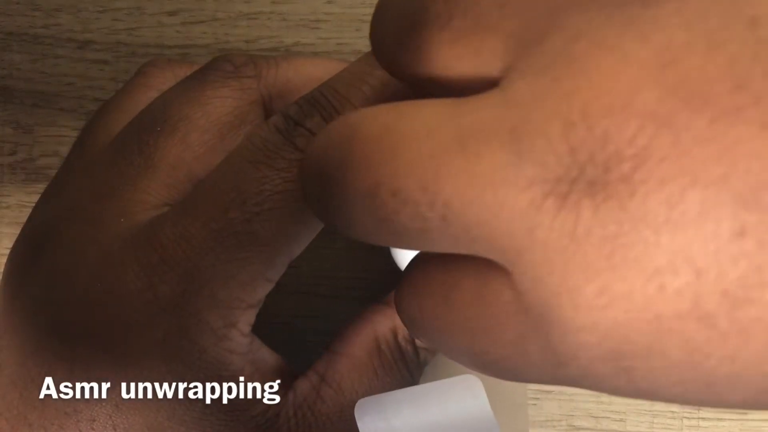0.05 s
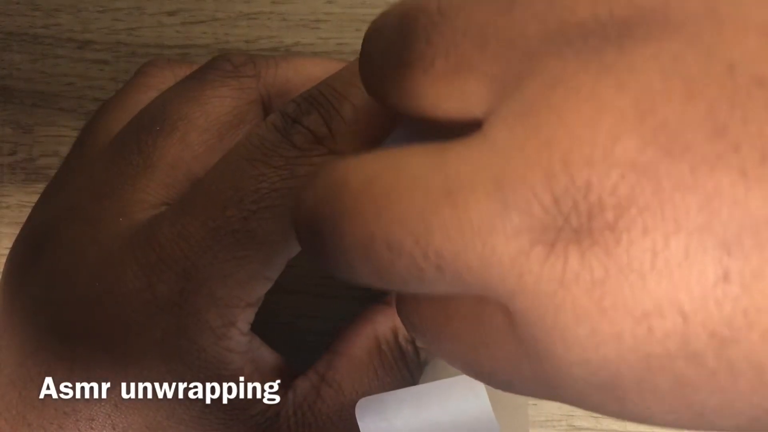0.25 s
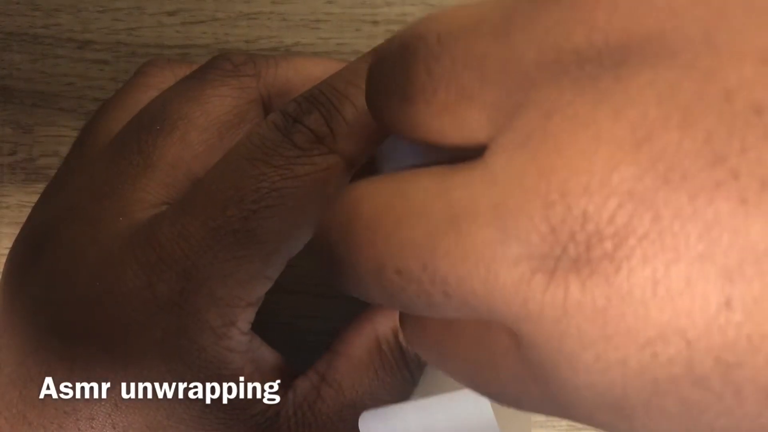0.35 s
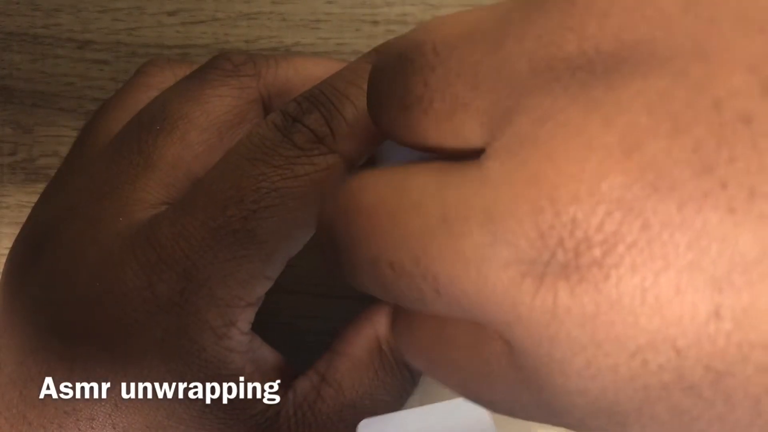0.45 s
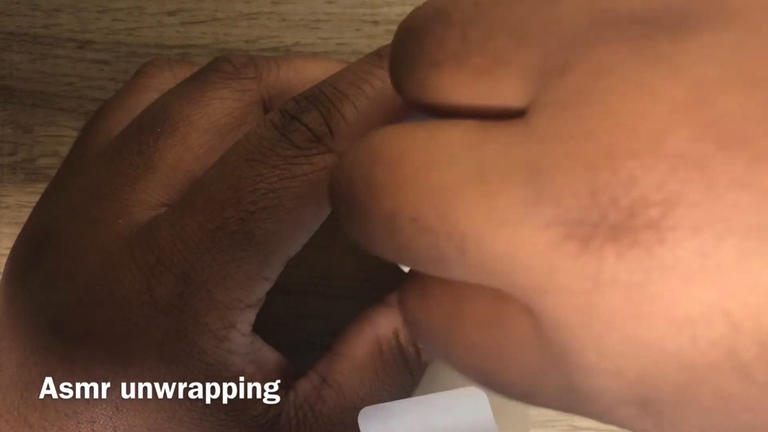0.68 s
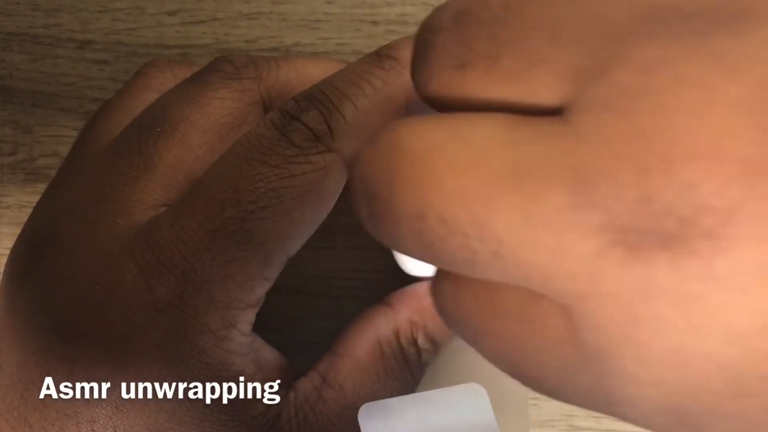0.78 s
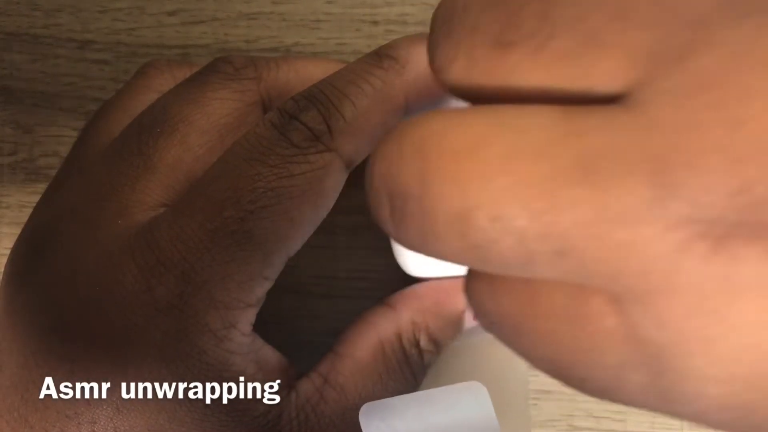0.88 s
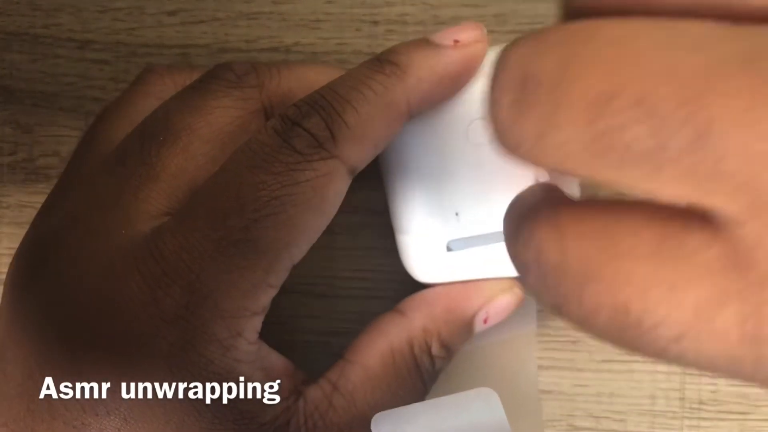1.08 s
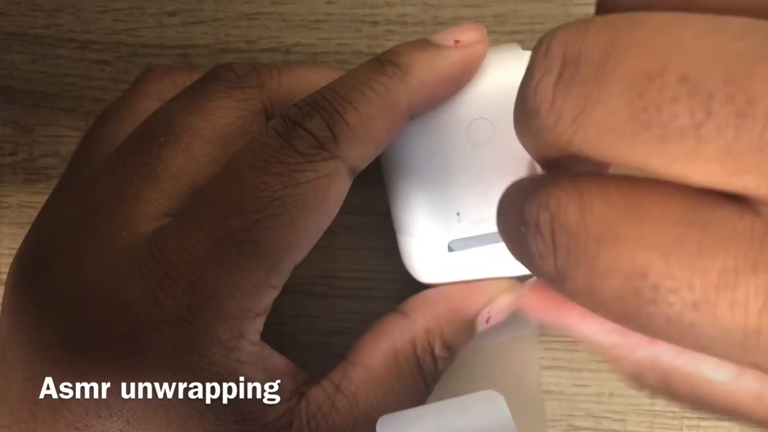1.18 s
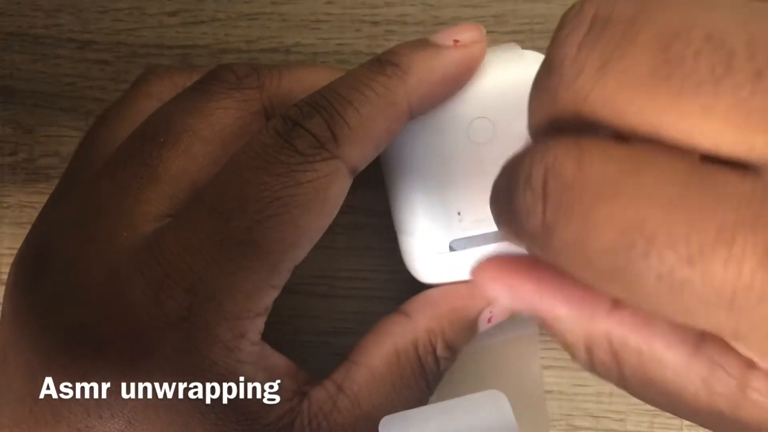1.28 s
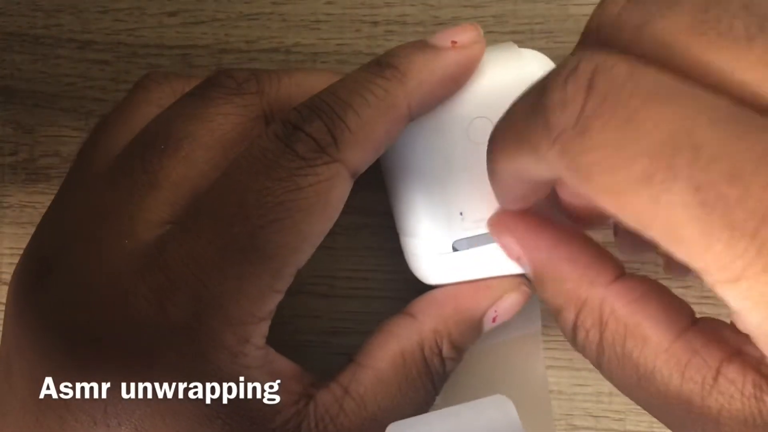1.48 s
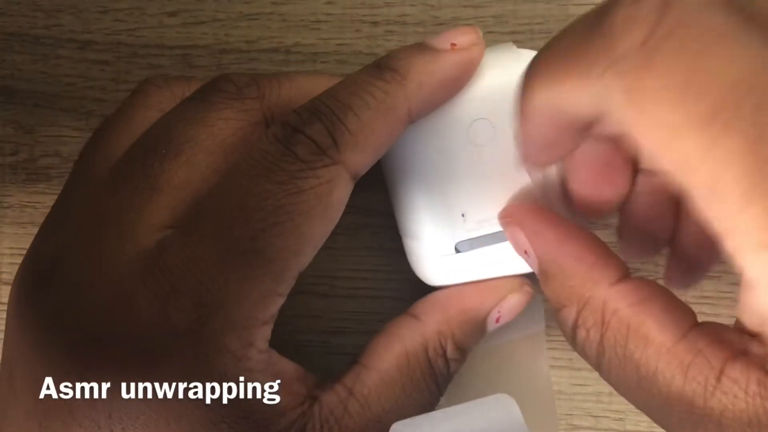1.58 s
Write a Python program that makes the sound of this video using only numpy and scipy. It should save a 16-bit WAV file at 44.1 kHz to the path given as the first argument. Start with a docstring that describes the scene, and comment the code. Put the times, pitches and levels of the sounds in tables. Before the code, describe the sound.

The lid of a small plastic case closes with a loud, close snap, followed by a lighter knock. Faint finger rubbing and soft bumps on wood lead to a thin double click, in a quiet room with a faint hum.

```python
"""A light brush of skin, then the lid of a small hollow plastic case catches and snaps shut, close by.
The case knocks once more; later a fingertip slips off an edge with a thin double click.
Each contact rings the thin shell and the hollow body. In between, fingers rub and shift the case
with stick-slip friction, and the hand bumps and drags on a wooden table.
A faint hum and rumble lie underneath, in a quiet room with a short echo."""
import sys
import numpy as np
from scipy import signal
from scipy.fft import rfft, irfft
from scipy.io import wavfile

SR = 44100
rng = np.random.default_rng(int(sys.argv[2]) if len(sys.argv) > 2 else 0)


def wav_out(sig):
    """Save sig, one row per channel (or a flat mono array), as 16-bit PCM at SR to the path in sys.argv[1]."""
    wavfile.write(sys.argv[1], SR, np.round(np.clip(np.atleast_2d(sig).T, -1, 1) * 32767).astype(np.int16))


N = 72765


def from_db(db):
    """Decibels to gain."""
    return 10 ** (np.asarray(db) / 20)


def unit_rms(x):
    """Scale to unit rms."""
    return x / np.sqrt(np.mean(x ** 2) + 1e-20)


def seconds():
    """Time of every sample."""
    return np.arange(N) / SR


def at_hz(points, hz, column=1):
    """Interpolate a table column over log frequency."""
    table = np.array(points)
    return np.interp(np.log(hz + 1e-9), np.log(table[:, 0]), table[:, column])


def coloured(x, spectrum, tilt_db_per_octave=0):
    """Apply a spectrum and a tilt; unit rms out."""
    hz = np.arange(N // 2 + 1) * SR / N
    octaves = np.log2(np.maximum(hz, 20) / 6000)
    gain = from_db(at_hz(spectrum, hz) + tilt_db_per_octave * octaves)
    return unit_rms(irfft(rfft(x) * gain, N))


def impulses(times_s, levels_db):
    """One impulse per contact."""
    hits = np.zeros(N)
    hits[np.round(times_s * SR).astype(int)] = from_db(levels_db)
    return hits


def stroke(peak_s, level_db, rise_s, hold_s, fall_s):
    """Envelope of one movement, held from peak_s; rise and fall each span 20 dB."""
    t = seconds() - peak_s
    rising = np.maximum(-t, 0) / rise_s
    falling = np.maximum(t - hold_s, 0) / fall_s
    return from_db(level_db - 20 * (rising + falling))


def ring(x, hz, t60_s):
    """Damped mode; a unit impulse rings at amplitude 1."""
    radius, angle = from_db(-60 / (t60_s * SR)), 2 * np.pi * hz / SR
    return signal.lfilter([1, 0, -1], [1, -2 * radius * np.cos(angle), radius ** 2], x + 1e-18) / 2


def resonance(x, hz, width_hz):
    """Band-pass with peak gain independent of width."""
    t60_s = np.log(1000) / (np.pi * width_hz)
    return 2 * np.pi * width_hz / SR * ring(x, hz, t60_s)


def friction(grains_per_s=3000, spread_db=6, hiss_share=0.7):
    """Stick-slip grains of uneven size over smooth hiss."""
    sizes = from_db(spread_db * np.minimum(rng.exponential(1, N), 4)) * rng.choice([-1, 1], N)
    grains = unit_rms(sizes * (rng.random(N) < grains_per_s / SR))
    return np.sqrt(1 - hiss_share) * grains + np.sqrt(hiss_share) * rng.standard_normal(N)


# Motor partials: pitch_hz, rms_db
MOTOR_HUM = [(58.5, -51), (87, -55), (117.6, -53.5), (203.8, -62.5), (232.5, -62), (290, -61.5)]
# Rumble and hiss: freq_hz, relative_db
FLOOR_SPECTRUM = [(20, -9), (35, -7), (55, 2.5), (100, -4.5), (190, 2), (300, -7.5), (450, -8),
                  (700, -16.5), (1500, -23.5), (3000, -29.5), (6000, -31), (15000, -33)]


def background(floor_db=-49.5):
    """Hum of a distant motor over room rumble and hiss."""
    hum = sum(np.sqrt(2) * from_db(db) * np.sin(2 * np.pi * (hz * seconds() + rng.random()))
              for hz, db in MOTOR_HUM)
    return hum + from_db(floor_db) * coloured(rng.standard_normal(N), FLOOR_SPECTRUM)


# Diffuse field: freq_hz, echo_gain_db, t60_s
ROOM_ECHO = [(200, -6.5, .38), (600, -12.5, 0.3), (1500, -13, 0.6), (3200, -10.5, .42), (7500, -12, 0.31),
             (14440, -11.5, 0.15)]


def room_bands(onset_s=0.0021):
    """Yield centre_hz, noise and decay envelope for each band of the diffuse field."""
    t, hz = seconds(), np.arange(N // 2 + 1) * SR / N
    white = rfft(rng.standard_normal(N))
    edges_hz = np.geomspace(100, 18000, 27)
    for low, high in zip(edges_hz, edges_hz[1:]):
        centre_hz = np.sqrt(low * high)
        noise = irfft(white * ((hz >= low) & (hz < high)), N)
        t60_s = at_hz(ROOM_ECHO, centre_hz, column=2)
        decay = from_db(-60 * t / t60_s) * (1 - np.exp(-t / onset_s))
        gain = from_db(at_hz(ROOM_ECHO, centre_hz)) / np.sqrt(np.sum(decay ** 2))
        yield centre_hz, noise, gain * decay


# Body radiation into the room: freq_hz, gain_db
BODY_SEND = [(100, -4.5), (400, 17), (1000, 24), (1500, 27), (2200, 18), (2800, 22.5), (3300, 14.5),
             (4300, 20), (6000, 14.5), (9000, 5.5), (16000, 7)]
# Shell radiation into the room: freq_hz, gain_db
SHELL_SEND = [(100, -19), (1000, -13), (3000, -3), (4500, -2), (6500, 4.5), (10000, 3.5), (16000, 0)]


def room(contacts, handling, handling_send=0.6):
    """Each contact adds energy to a smooth dying echo; handling noise echoes in the same room."""
    times_s, shell_db, body_db = np.transpose(contacts)[:3]
    tail, response = 0, 0
    for centre_hz, noise, decay in room_bands():
        body = impulses(times_s, body_db + at_hz(BODY_SEND, centre_hz))
        shell = impulses(times_s, shell_db + at_hz(SHELL_SEND, centre_hz))
        energy = signal.fftconvolve(body ** 2 + shell ** 2, decay ** 2)[:N]
        tail += noise * np.sqrt(np.abs(energy))
        response += noise * decay
    return tail + handling_send * signal.fftconvolve(handling, response)[:N]


# Hand drags: peak_s, level_db, rise_s, hold_s, fall_s
DRAG_STROKES = [(0.847, -50.5, .140, 0.056, 0.043), (1.198, -58.5, 0.096, 0.041, .080)]
# Skin on wood: freq_hz, relative_db
DRAG_SPECTRUM = [(100, 1.5), (400, 4), (800, -5.5), (1300, -1.5), (1650, -13), (2050, -4), (2600, -22),
                 (8000, -28)]


def hand_drags():
    """The hand sticks and slips across the table."""
    return sum(stroke(*drag) for drag in DRAG_STROKES) * coloured(friction(), DRAG_SPECTRUM)


# Table bumps: peak_s, level_db, rise_s, hold_s, fall_s
BUMP_STROKES = [(0.202, -32, 0.0022, 0.0054, .020), (0.529, -37.5, 0.00088, 0.009, 0.013),
                (0.904, -46.5, .004, 0.0046, 0.022)]
# Wooden top: freq_hz, relative_db
WOOD_SPECTRUM = [(60, -8.5), (170, 0.5), (300, -4), (440, 2.5), (620, -16.5), (1300, -25.5), (2500, -40),
                 (8000, -57.5)]


def table_bumps():
    """Soft bumps draw dull thuds from the wood."""
    return sum(stroke(*bump) for bump in BUMP_STROKES) * coloured(rng.standard_normal(N), WOOD_SPECTRUM)


# Brush fade: time_s, level_db
BRUSH_ENVELOPE = [(0.0, -36), (0.025, -43), (0.074, -52), (0.12, -61), (0.191, -81.5)]
# Airy skin noise: freq_hz, relative_db
BRUSH_SPECTRUM = [(500, -9), (2200, -14.5), (4300, -9), (5200, 0.5), (6200, -9), (7400, -13), (8600, -9.5),
                  (10500, -8.5), (11900, -2), (13500, -5.5), (16000, -4)]


def skin_brush():
    """Skin brushes lightly past as the grip changes."""
    times_s, level_db = np.transpose(BRUSH_ENVELOPE)
    envelope = from_db(np.interp(seconds(), times_s, level_db))
    return envelope * coloured(rng.standard_normal(N), BRUSH_SPECTRUM)


# Case shifts: peak_s, level_db, rise_s, hold_s, fall_s
SLIDE_STROKES = [(0.232, -44, 0.016, 0.0098, 0.032), (0.301, -39, .05, 0.034, 0.029)]
# Sliding case resonances: pitch_hz, width_hz, relative_db
SLIDE_MODES = [(1480, 580, -5), (2630, 470, -7), (3800, 350, 2.5), (4380, 450, 2.5), (7300, 380, -3),
               (9300, 500, -6.5), (11400, 540, -10.5), (12900, 520, -10.5)]


def case_slides():
    """Friction drives the resonances of the case as it shifts under the fingers."""
    grain = friction()
    ringing = sum((-1) ** k * from_db(db) * resonance(grain, hz, width_hz)
                  for k, (hz, width_hz, db) in enumerate(SLIDE_MODES))
    return sum(stroke(*slide) for slide in SLIDE_STROKES) * unit_rms(ringing)


# Finger rubs: peak_s, level_db, rise_s, hold_s, fall_s, tilt_db_per_octave, hollow_hz
RUB_STROKES = [(0.197, -41, 0.064, 0.0078, .010, -2.5, 7300), (0.48, -51, .060, 0.015, 0.058, -3, 7300),
               (0.515, -48.5, 0.013, 0.013, 0.045, -2, 9200),
               (0.551, -44.5, 0.019, 0.016, 0.017, 0.5, 7300),
               (0.575, -51, 0.017, 0.012, 0.037, -1.5, 2600), (0.635, -61, 0.035, 0.013, .040, -2, 7350),
               (0.719, -48, 0.034, 0.0029, .006, -1, 8860), (0.846, -54, .050, .012, 0.098, 0, 6560),
               (0.88, -48, 0.021, 0.019, 0.013, -0.5, 8240), (0.941, -42, 0.017, 0.0029, 0.0037, 1.5, 8400),
               (1.037, -60, 0.027, 0.023, .060, -3, 5600), (1.146, -55.5, 0.12, 0.09, 0.036, -2.5, 5460),
               (1.297, -42.5, 0.022, 0.033, 0.047, 1, 11160),
               (1.378, -54.5, .010, 0.015, 0.0081, -3, 12000),
               (1.395, -32, 0.015, 0.0014, 0.0058, 1.5, 11500), (1.406, -62, 0.0081, 0.013, 0.096, 0, 6200),
               (1.471, -50, .020, .010, .015, 6, 8360), (1.601, -50.5, .004, 0.01, 0.023, -0.5, 6580),
               (1.645, -60, .030, .010, .030, -1, 8400)]
# Skin on plastic: freq_hz, relative_db
RUB_SPECTRUM = [(300, -8.5), (1000, -5.5), (1700, -8.5), (2300, -3), (3100, -0.5), (3900, -1), (4800, -3),
                (6400, -0.5), (7700, -3), (8700, 1), (10000, -5), (12000, -4), (14000, -6), (16000, -5.5)]


def finger_rubs(modes, ring_db=-11, ring_width_hz=170, hollow_db=-11, hollow_width_hz=260):
    """Skin friction stirs the case modes; the hollow under the hand colours each stroke."""
    grain, rubs = friction(), 0
    ringing = unit_rms(sum(resonance(grain, hz, ring_width_hz) for hz, _, _ in modes))
    rubbed = grain + from_db(ring_db) * ringing
    for *movement, tilt, hollow_hz in RUB_STROKES:
        hollow = from_db(hollow_db) * unit_rms(resonance(grain, hollow_hz, hollow_width_hz))
        rubs += stroke(*movement) * unit_rms(coloured(rubbed, RUB_SPECTRUM, tilt) + hollow)
    return rubs


def struck(modes, times_s, levels_db, scatter_db=1):
    """Each contact rings all modes, with slight random scatter in strength."""
    offsets_db = scatter_db * rng.standard_normal((len(times_s), len(modes)))
    return sum((-1) ** k * ring(impulses(times_s, levels_db + db + offsets_db[:, k]), hz, t60_s)
               for k, (hz, db, t60_s) in enumerate(modes))


# Case contacts: start_s, shell_db, body_db, crack_db, tick_db, tick_hz
CONTACTS = [(0.1974, -11, -32, -34, -13, 7300), (0.2, -12, -48, -32, -22, 7200),
            (0.202, -12, -38, -24, -16, 7400), (0.2038, -6, -47, -21, -10, 9100),
            (0.2065, -2.5, 1.5, -4.5, 3, 7100), (0.2072, -27, -24, -25, 0.5, 4000),
            (0.3357, -6.5, -23, -30, -14.5, 6100), (0.3355, -14.5, -23, -20, -25, 6060),
            (0.5178, -38, -48, -43, -25.5, 4150), (0.7204, -48, -53, -52, -34, 8900),
            (0.937, -38, -56.5, -51, -31, 8400), (0.9447, -38, -51, -55, -37, 8370),
            (1.1945, -40, -44, -52, -36, 6030), (1.3944, -29, -35, -45, -20, 14500),
            (1.397, -27, -53, -33, -32, 9000), (1.398, -9, -45, -40, -0.5, 8500),
            (1.3993, 0, -20, -17, -4, 9200), (1.5390, -39, -59, -52, -43, 13000),
            (1.561, -50, -50.5, -48, -55, 12000), (1.6007, -44, -53, -50, -42.5, 6700)]
# Thin shell and edges: pitch_hz, gain_db, t60_s
SHELL_MODES = [(6060, -15, .011), (6600, -11.5, .008), (7260, -26.5, .010), (8240, -17.5, 0.01),
               (9100, -20, .007), (10500, -24, 0.018), (11550, -20.5, 0.0099), (12200, -15.5, 0.0051),
               (15200, -26.5, .007)]
# Hollow body: pitch_hz, gain_db, t60_s
BODY_MODES = [(860, -11, 0.014), (1095, -7.5, .013), (1389, -11.5, .018), (2093, -4.5, 0.018),
              (2766, -6.5, 0.012), (3757, -11, 0.023), (4070, -4.5, 0.0032), (4486, -8, 0.015),
              (5100, -22.5, 0.0092), (6600, -19.5, 0.003), (7320, -15, 0.021)]
# Gritty crack: freq_hz, relative_db
CRACK_SPECTRUM = [(200, -10.5), (600, -7.5), (1500, -6.5), (4000, -4), (7000, -6.5), (10000, 1), (13000, 1),
                  (16000, -10)]


def case_clicks(tick_t60_s=0.0017, crack_t60_s=0.011, low_cut_hz=660):
    """Hard plastic contacts: edge tick, brief crack, bright shell ring and hollow body ring."""
    times_s, shell_db, body_db, crack_db, tick_db, tick_hz = np.transpose(CONTACTS)
    ticks = sum(ring(impulses(start_s, db), hz, tick_t60_s)
                for start_s, db, hz in zip(times_s, tick_db, tick_hz))
    decay_per_sample = from_db(-60 / (crack_t60_s * SR))
    crack_envelope = signal.lfilter([1], [1, -decay_per_sample], impulses(times_s, crack_db) + 1e-18)
    crack = crack_envelope * coloured(rng.standard_normal(N), CRACK_SPECTRUM)
    shell = struck(SHELL_MODES, times_s, shell_db)
    body = struck(BODY_MODES, times_s, body_db)
    # A small case radiates little bass.
    radiation = signal.butter(4, low_cut_hz, "high", fs=SR, output="sos")
    return signal.sosfilt(radiation, ticks + shell + body + crack)


def scene():
    """The handled case in its room, mono."""
    handling = finger_rubs(SHELL_MODES + BODY_MODES) + skin_brush() + case_slides()
    handling += table_bumps() + hand_drags()
    return (case_clicks() + handling + room(CONTACTS, handling) + background())[None]


def record(dry, cutoff_hz=16000):
    """The loudest snap overloads and clips; a steep low-pass cuts the top."""
    low_pass = signal.firwin(255, cutoff_hz, fs=SR)
    return signal.fftconvolve(np.clip(dry, -1, 1), low_pass[None], mode="same")


dry = scene()
out = record(dry)
wav_out(out)
```